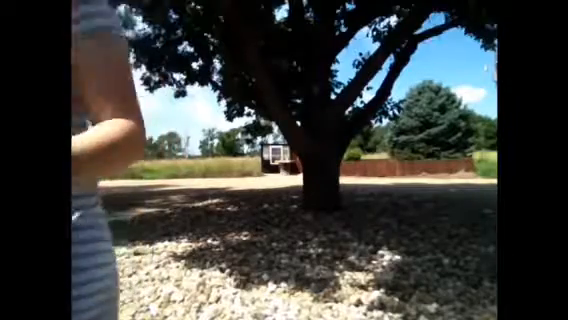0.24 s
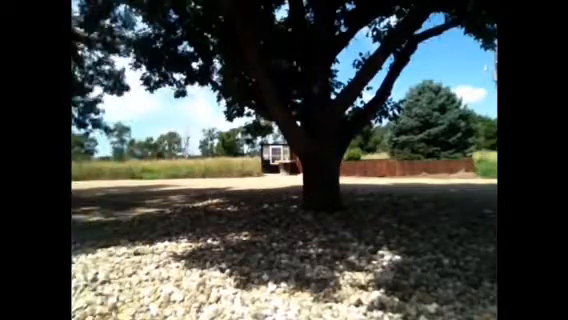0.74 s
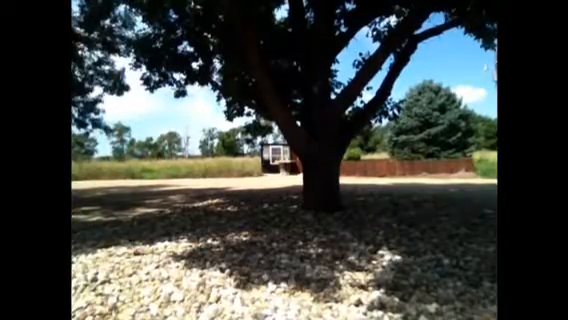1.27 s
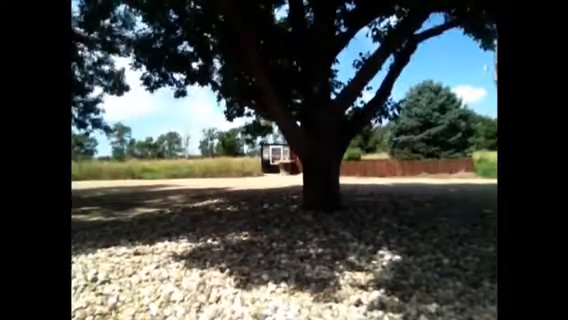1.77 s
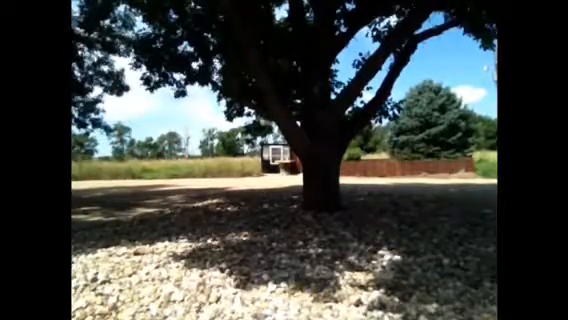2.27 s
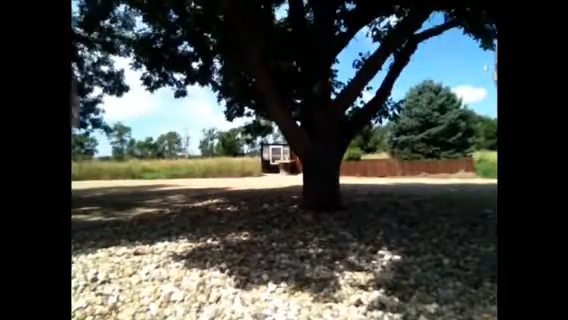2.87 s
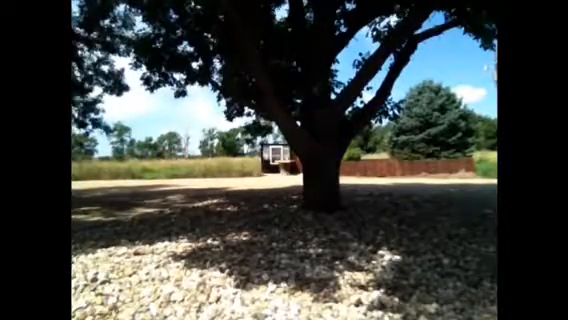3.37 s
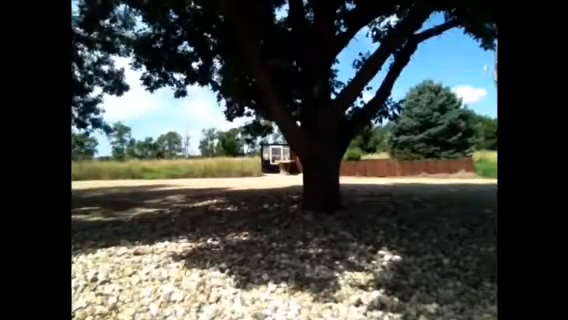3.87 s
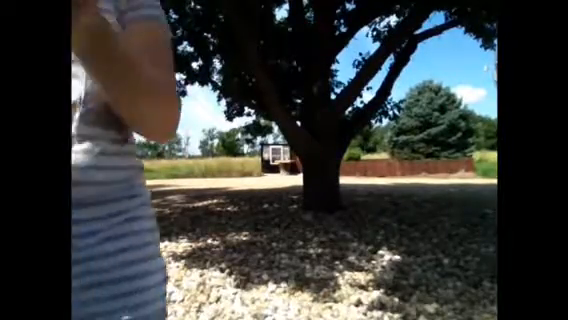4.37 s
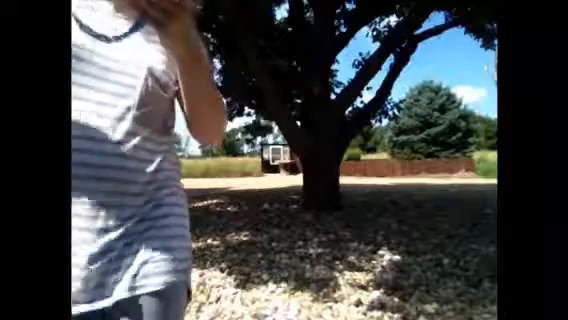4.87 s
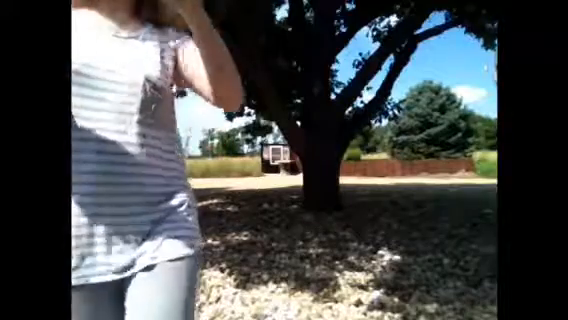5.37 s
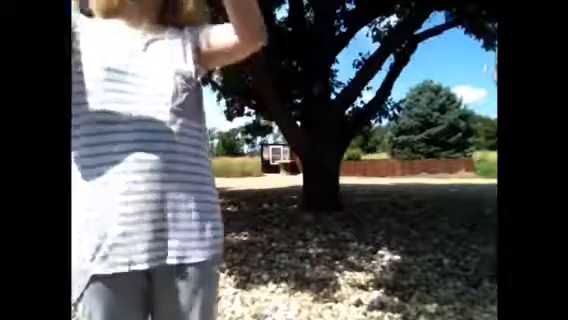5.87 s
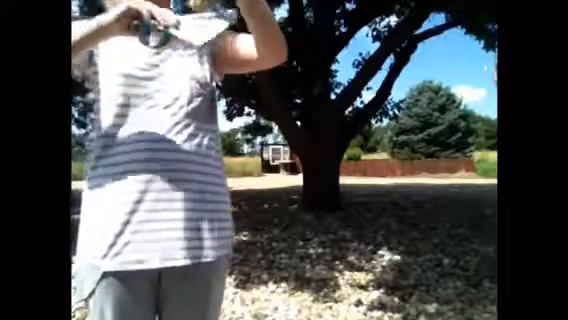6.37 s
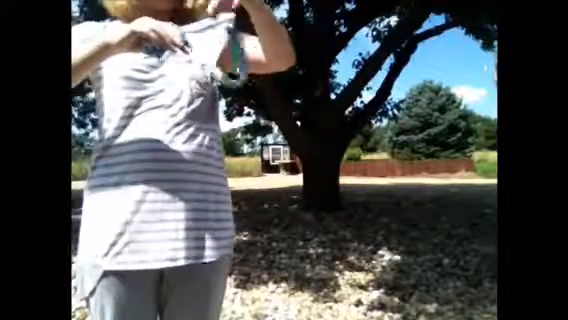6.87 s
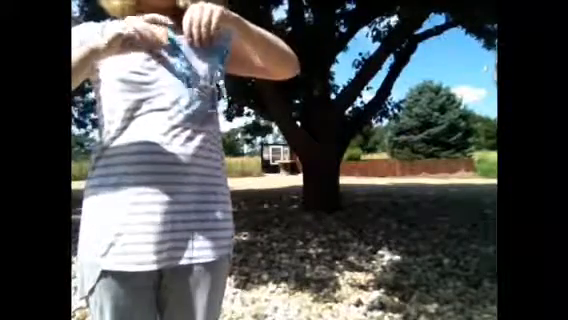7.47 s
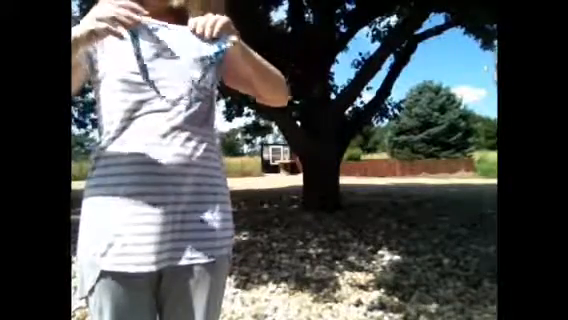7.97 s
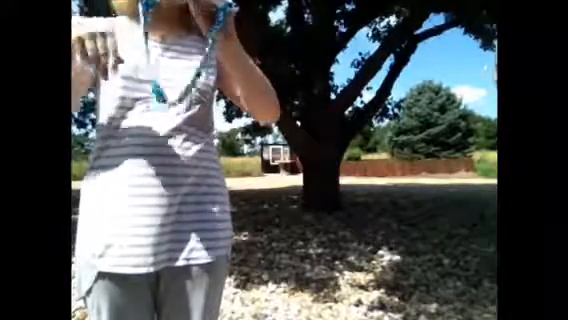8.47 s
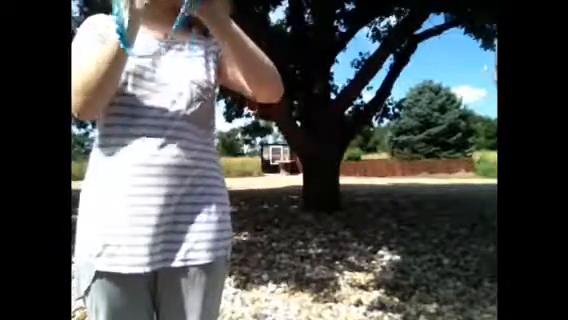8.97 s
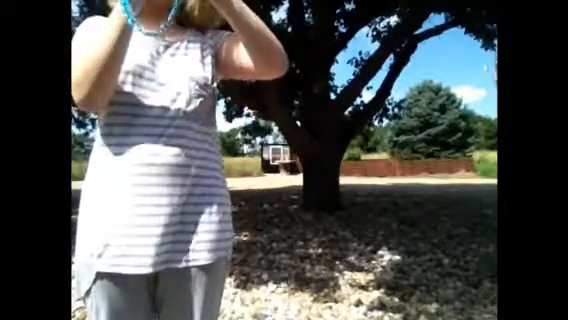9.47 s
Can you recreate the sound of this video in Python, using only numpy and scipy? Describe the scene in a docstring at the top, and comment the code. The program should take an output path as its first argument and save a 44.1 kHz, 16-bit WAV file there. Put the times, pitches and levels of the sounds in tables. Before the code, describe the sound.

Quiet outdoor yard with faint birds and leaf hiss; nearby wooden knocks in three clusters, light metallic ticks and a gritty slide, then soft footsteps.

```python
"""A quiet summer yard under a big tree, heard on a phone: from the start, coloured noise makes distant air,
a low drone and the bright hiss of leaves and insects, small birds whistle gliding tones far off in the
trees, and dry litter snaps in short noise bursts. Before the first second a wooden door close by is shoved
along its track (gritty noise) and knocked (ringing modes), with two faint thuds. From about 2.5 s a loose
fitting ticks as the door slides and latches; from about 3.9 s slow steps thud and snap more litter."""
import sys
import numpy as np
from scipy import signal
from scipy.fft import rfft, irfft
from scipy.io import wavfile
from scipy.ndimage import uniform_filter1d

SR = 44100
rng = np.random.default_rng(int(sys.argv[2]) if len(sys.argv) > 2 else 0)


def boost_factor(decibels):
    """Convert a level in decibels to a linear amplitude factor."""
    exponent = np.asarray(decibels, float) / 20
    return 10 ** exponent


def dump(signal):
    """Clip the signal to [-1, 1] and save it as 16-bit WAV at the path in sys.argv[1]."""
    limited = np.clip(np.atleast_2d(signal).T, -1, 1)
    pcm = np.round(limited * 32767).astype(np.int16)
    wavfile.write(sys.argv[1], SR, pcm)


N = 429093
T = np.arange(N) / SR  # time [s]

# tone colour of the distant air: (frequency [Hz], relative level per Hz [dB])
AIR_COLOUR = [(15, -35), (25, -13), (49, -59), (96, -8.5), (220, 4), (296, -7), (376, -2.5), (442, -2),
              (627, -8.5), (820, -8), (1400, -13.5), (6140, -13.5), (7210, -13.5), (10800, -8),
              (15300, -23)]
# distant machine: (frequency [Hz], width [Hz], level [dB])
DRONE_TONES = [(239.3, 17.97, -69), (354.3, 43, -66), (448, 40, -69)]
# the breeze over time: (time [s], leaf hiss level [dB], level of the rumble on the microphone [dB])
BREEZE_LEVELS = [(0, -59.5, -80), (.8, -60.5, -80), (.92, -60.5, -71), (1.45, -64, -73), (2.1, -60, -75),
                 (2.46, -62, -82), (2.75, -67, -84), (3.4, -61.5, -79), (3.9, -64.5, -74),
                 (4.5, -59.5, -76.5), (5.25, -60.5, -76.5), (5.75, -68, -70), (5.98, -64, -75),
                 (6.15, -57, -75.5), (6.7, -62, -75.5), (8.2, -59.5, -80), (8.6, -62.5, -82),
                 (9.25, -64.5, -82), (9.73, -60, -83)]
# colour of the leaf hiss: (frequency [Hz], width [Hz], relative level [dB])
LEAF_BANDS = [(10610, 2000, -3.5), (12180, 3100, 0), (14300, 2100, -3.5)]

# one bird opens each call with a quick hoarse upward chip: (time [s], first pitch [Hz], level [dB])
BIRD_CHIPS = [(0.241, 5550, -50.5), (1.39, 6000, -62), (2.335, 5600, -62), (4.15, 5440, -59),
              (5.49, 5950, -65), (7.335, 6170, -59.5), (8.548, 5900, -50.5)]
# falling slurs, all sliding down at one pace: (time [s], length [s], first pitch [Hz], level [dB])
BIRD_SLURS = [(0.309, .053, 6500, -54.5), (0.537, 0.08, 6600, -70), (1.444, 0.088, 6430, -58.5),
              (1.967, 0.075, 5900, -66), (2.388, 0.074, 6550, -58.5), (5.562, 0.067, 6540, -62),
              (5.847, .08, 6800, -73), (6.735, 0.079, 6770, -66), (7.404, 0.041, 6550, -53.5),
              (8.115, 0.065, 6600, -69), (8.176, .031, 4950, -63.5), (8.37, .05, 6130, -67),
              (8.408, .04, 4980, -64.5), (8.607, 0.03, 6580, -51), (8.635, 0.043, 5050, -66),
              (9.045, 0.054, 4300, -68.5), (9.39, .05, 7070, -69), (9.434, 0.037, 6070, -63.5),
              (9.48, .04, 5800, -74)]
# swoops and slow glides: (time [s], length [s], first pitch [Hz], last pitch [Hz], level [dB])
BIRD_GLIDES = [(0, 0.14, 4830, 4430, -76), (3.82, .096, 4930, 4300, -73), (3.94, 0.053, 4300, 4590, -71.5),
               (6.012, .21, 3200, 3400, -79), (6.798, .3, 5650, 5150, -77),
               (8.746, .077, 3320, 5280, -67.5), (8.925, 0.065, 3300, 6150, -65)]
# peeps on one pitch: (time [s], length [s], pitch [Hz], level [dB])
BIRD_PEEPS = [(.295, 0.018, 6720, -50.5), (1.28, .08, 7000, -75), (1.585, .16, 4580, -73),
              (1.8, .04, 7130, -73), (2.015, .055, 4110, -71), (2.11, .04, 3290, -73),
              (2.28, .045, 5520, -70), (4.2, 0.015, 6750, -57.5), (4.6, .24, 6980, -76.5),
              (6.135, .04, 7100, -72), (6.35, .024, 6600, -70), (7.1, .08, 6830, -74),
              (7.5, 0.022, 6050, -66), (7.685, .058, 6320, -72.5), (8.07, 0.06, 6750, -71),
              (8.265, 0.065, 5600, -71), (8.665, .026, 6050, -65)]

# dry litter snapping: (time [s], peak level [dB], centre [Hz], width [octaves], crunch against break [dB])
LITTER_SNAPS = [(.16, -49, 1800, .4, -16), (.193, -39, 2320, 0.52, -23), (1.1994, -52, 2430, 0.49, -7),
                (2.176, -39, 2900, 1.1, -16), (3.88, -48, 4020, 1.6, -8.5), (4.38, -46.5, 3210, 0.21, -25),
                (4.394, -53, 1600, 1.1, -13), (4.559, -48, 1590, .6, -13), (4.708, -46.5, 3140, .12, -29),
                (4.9792, -51, 1000, 0.48, -10), (5.022, -46, 5800, 0.6, -21),
                (5.064, -41.5, 2300, 0.84, -16), (5.314, -39, 6000, 1.3, -24),
                (5.346, -39.5, 2700, .7, -11), (5.347, -41, 5100, .55, -19),
                (5.657, -29.5, 5300, 0.81, -19.5), (5.6894, -52, 4500, .9, -8),
                (6.5318, -39, 4380, 0.8, -17), (7.1375, -48, 3800, .7, -19), (7.315, -46, 4000, .65, -20),
                (9.0242, -50, 1300, 0.9, -14)]

# shoves of the door: (time [s], length [s], level [dB], hiss centre at start [Hz], at end [Hz])
DOOR_SHOVES = [(0.816, 0.13, -67.5, 3600, 4200), (0.968, 0.16, -71, 3600, 4300),
               (2.2, .13, -67, 4600, 4560), (2.558, 0.16, -62.5, 4000, 4200),
               (2.72, .14, -60.5, 4100, 4500), (2.938, 0.16, -61, 5400, 6300),
               (3.11, 0.11, -58.5, 5000, 5130)]
# resonances of the door's track: (frequency [Hz], width [Hz], relative level [dB])
TRACK_BANDS = [(2300, 1400, 10), (3400, 950, 2), (4300, 700, 0), (4950, 220, -5), (5900, 1200, -0.5),
               (6800, 98, -3), (8100, 600, -6)]

# blows on the door: (time [s], peak level [dB], contact colour [Hz],
# hardness = crack peak against the body of the blow [dB], rattle strength [dB])
DOOR_KNOCKS = [(.819, -42, 2400, -2, -11), (0.833, -46, 400, 3.5, 2), (0.875, -45, 300, -12, -8),
               (0.912, -39.5, 320, -16, -3), (.945, -14.5, 1450, -16, -14.5), (.963, -30.5, 605, -8.5, -13),
               (1.045, -48, 700, -14, 2), (1.323, -21, 720, -18.5, -16), (1.428, -34.5, 1400, -9, -6),
               (1.437, -10.5, 680, -5, -17), (1.508, -31, 537, -17, -11), (1.537, -28, 400, -15.5, -14.5),
               (1.909, -20, 696, -11, -10.5), (1.915, -7, 950, -7, -10.5), (1.943, -17.5, 850, -12.5, -10),
               (1.99, -34.5, 580, -26, -4), (3.214, -12, 1650, -18, -16), (3.225, -28, 900, 2.5, -13),
               (3.254, -41.5, 1350, -2, -15), (3.424, -19, 970, -10, -12.5), (3.436, -27, 1480, -0.5, -13),
               (3.47, -41, 1200, -10, -2), (3.498, -28.5, 1700, -26, -8), (3.516, -34, 1370, -17, -12.5)]
# what the door rings with: (frequency [Hz], relative level [dB], time to fall 60 dB [s])
DOOR_MODES = [(171.5, -12.5, 0.073), (262, -14, 0.053), (326, -9.5, 0.073), (400, -3, 0.062),
              (430, -10, 0.055), (538, -5, 0.044), (602, -5.5, 0.046), (681, -5, 0.046), (783, -6, 0.028),
              (940, 1, 0.02), (1025, -9.5, 0.045), (1200, -2, 0.027), (1400, -0.5, 0.028),
              (1667, -2, 0.023), (1970, -4.5, 0.017), (2330, -5, 0.026), (3010, -11, 0.016),
              (3900, -8.5, 0.0077)]

# heels on soft ground: (time [s], peak level [dB], thud pitch [Hz])
HEEL_STEPS = [(.873, -47, 150), (.912, -47, 180), (3.883, -43.5, 156), (3.944, -53, 199), (4.039, -58, 105),
              (4.409, -49.5, 106), (5.461, -44, 155), (5.693, -49, 181), (5.953, -54, 99.6),
              (6.085, -49, 118), (6.119, -43.5, 139), (6.229, -52, 130.7)]

# ticks of the loose fitting: (time [s], peak level [dB], brightness [dB per octave])
FITTING_TICKS = [(2.4872, -49, -12), (2.6206, -30, 8), (2.6274, -39.5, 23), (2.635, -34, 12),
                 (2.66, -43.5, 2), (2.6745, -46, -8), (2.7726, -48, 13), (2.7995, -40.5, 9.5),
                 (2.8409, -40.5, -1), (2.8687, -35, 6), (2.889, -44, -1), (2.9287, -44, -18),
                 (3.024, -48.5, 4), (3.044, -48.5, -13), (3.092, -40.5, -16), (3.1064, -48, -10),
                 (3.1825, -51, -13), (3.215, -25, -7), (3.437, -28, 6), (3.545, -36, -20)]
# what the fitting rings with: (frequency [Hz], relative level [dB], time to fall 60 dB [s])
FITTING_MODES = [(1400, 17, 0.023), (1900, -13, .01), (2360, 10.5, 0.023), (3200, -21, .015),
                 (4600, -14, 0.0094), (7140, -24, 0.017)]


def unit(x):
    """Scale to rms 1."""
    return x / np.sqrt(np.mean(x ** 2))


def band(x, hz, width_hz):
    """One resonance, gain 1 at its centre."""
    return signal.lfilter(*signal.iirpeak(min(hz, .45 * SR), hz / width_hz, SR), x)


def ring(modes, size, tilt_db=0):
    """Sum of dying sine waves, made brighter or duller by a tilt in dB per octave about 2 kHz."""
    t = np.arange(size) / SR
    out = np.zeros(size)
    for hz, db, t60 in modes:
        fading = boost_factor(db + tilt_db * np.log2(hz / 2000) - 60 * t / t60)
        out += fading * np.sin(2 * np.pi * hz * t)
    return out


def add(out, s, peak_db, x):
    """Lay a sound down at time s with the given peak."""
    i = max(int(s * SR), 0)
    out[i:i + len(x)] += (x * boost_factor(peak_db) / np.abs(x).max())[:N - i]


def walk(rate):
    """Slow random wandering of rms 1, drawing new values at the given rate per second."""
    k = int(SR / rate)
    held = np.repeat(rng.standard_normal(N // k + 1), k)
    smooth = uniform_filter1d(uniform_filter1d(held, k), k)
    return unit(smooth[:N])


def distant_air():
    """Smooth steady noise, coloured by shaping its spectrum."""
    hz, db = np.transpose(AIR_COLOUR)
    f = np.maximum(np.fft.rfftfreq(N, 1 / SR), 1)
    colour = boost_factor(np.interp(np.log(f), np.log(hz), db))
    air = irfft(rfft(rng.standard_normal(N)) * colour, N)
    return boost_factor(-59) * unit(air)


def distant_drone():
    """Narrow bands of noise make low tones that waver in level."""
    out = np.zeros(N)
    for hz, width, db in DRONE_TONES:
        tone = unit(band(rng.standard_normal(N), hz, width))
        out += boost_factor(db + 1.7 * walk(3.155)) * tone
    return out


def breeze():
    """The breeze stirs leaves into a high hiss and makes a low rumble on the microphone."""
    s, leaf_db, rumble_db = np.transpose(BREEZE_LEVELS)
    leaves = np.zeros(N)
    for hz, width, db in LEAF_BANDS:
        hiss = unit(band(band(rng.standard_normal(N), hz, width), hz, width))
        leaves += boost_factor(db + walk(3.5) / 2) * hiss
    rumble = unit(band(band(rng.standard_normal(N), 106, 79.2), 106, 79.2))
    rumble = rumble * boost_factor(0.83 * walk(36))
    leaf_level = boost_factor(np.interp(T, s, leaf_db) + walk(10) / 2)
    return leaf_level * unit(leaves) + boost_factor(np.interp(T, s, rumble_db)) * rumble


def birds():
    """Gliding whistles with a shaky pitch, smeared by echoes off trunks and fences."""
    chip_s, chip_rise_hz, slur_hz_per_s = 0.021, 1700, -17500
    chip_hoarse_hz, hoarse_hz = 260, 73.5  # rms size of the pitch shake
    notes = []
    for s, hz, db in BIRD_CHIPS:
        notes.append((s, chip_s, hz, hz + chip_rise_hz, db, chip_hoarse_hz))
    for s, length, hz, db in BIRD_SLURS:
        notes.append((s, length, hz, hz + slur_hz_per_s * length, db, hoarse_hz))
    for s, length, first_hz, last_hz, db in BIRD_GLIDES:
        notes.append((s, length, first_hz, last_hz, db, hoarse_hz))
    for s, length, hz, db in BIRD_PEEPS:
        notes.append((s, length, hz, hz, db, hoarse_hz))

    out, shake = np.zeros(N), walk(900)
    for s, length, first_hz, last_hz, db, shake_hz in notes:
        i, n = int(max(s, 0) * SR), int(length * SR)
        pitch = np.linspace(first_hz, last_hz, n) + shake_hz * shake[i:i + n]
        whistle = np.sqrt(2) * np.sin(2 * np.pi * np.cumsum(pitch) / SR)
        # the fades at both ends together take 0.35 of the note
        out[i:i + n] += boost_factor(db) * signal.windows.tukey(n, .35) * whistle

    t = T[:SR // 2]
    echoes = rng.standard_normal(len(t)) * boost_factor(-60 * t / .35)  # fall by 60 dB in 0.35 s
    echoes = echoes / np.linalg.norm(echoes)
    return out + boost_factor(2) * signal.fftconvolve(out, echoes)[:N]


def snaps():
    """A sharp break inside a short soft crunch, both made of filtered noise."""
    break_s, crunch_s, lead_s = 0.0011, 0.02, .03  # the crunch starts ahead of the break by lead_s
    out, t = np.zeros(N), T[:SR // 8] - lead_s
    for s, peak_db, hz, octaves, crunch_db in LITTER_SNAPS:
        sharp = (t >= 0) * np.exp(-np.abs(t) / break_s)
        crunch = boost_factor(crunch_db) * np.exp(-(t / crunch_s) ** 2)
        burst = (sharp + crunch) * rng.standard_normal(len(t))
        burst = band(band(burst, hz, hz * octaves), hz, 2 * hz * octaves)
        add(out, s - lead_s, peak_db, burst)
    return out


def slide():
    """Gritty, uneven friction; speed sets which resonances of the track it reaches."""
    rise_s, stop_s, reach_octaves = .07, .03, 0.5
    grit = rng.standard_normal(N) * boost_factor(0.76 * walk(60))
    tones = []
    for hz, width, mode_db in TRACK_BANDS:
        tone = unit(band(band(grit, hz, width), hz, 0.69 * width))
        tones.append(boost_factor(mode_db + 1.1 * walk(24.77)) * tone)

    out = np.zeros(N)
    for s, length, db, first_hz, last_hz in DOOR_SHOVES:
        # the table's start and end fall halfway up and down the fades
        fade = np.minimum((T - s) / rise_s, (s + length - T) / stop_s) + .5
        gate = boost_factor(db) * np.clip(fade, 0, 1)
        centre_hz = np.interp(T, [s, s + length], [first_hz, last_hz])
        for (hz, _, _), tone in zip(TRACK_BANDS, tones):
            reach = np.exp(-(np.log2(hz / centre_hz) / reach_octaves) ** 2)
            out += gate * tone * reach
    return out


def knocks():
    """Each blow is a push and a dying rattle; both ring the door and are also heard bare, as a crack."""
    crack_s, crack_hz, crack_width_hz = 0.00062, 2800, 1150
    out, t = np.zeros(N), T[:SR // 3]
    push = t == 0
    for s, peak_db, hz, crack_db, rattle_db in DOOR_KNOCKS:
        # a harder contact reaches a wider band of modes
        width_hz = hz * 2.96 * 2 ** (.08 * crack_db)
        noise = rng.standard_normal((3, len(t)))

        # every spot struck drives the modes with other signs;
        # their pitches shift a little at random so that repeated blows do not ring identically
        door = np.zeros(SR // 8)
        for mode_hz, db, t60 in DOOR_MODES:
            sign, shift = np.sign(rng.standard_normal()), rng.standard_normal() / 30
            door += sign * ring([(mode_hz * (1 + shift), db, t60)], size=SR // 8)

        rattle = boost_factor(rattle_db - 60 * t / 0.11)
        # the rattle dulls as it settles: its low part lasts longest
        settling = boost_factor(rattle_db - 60 * t / 0.23) * band(noise[2], 270, 680)
        settling = settling * (700 / hz) ** 0.697
        drive = push + 0.09 * rattle * noise[0] + 0.15 * settling
        body = signal.fftconvolve(drive, door)[:len(t)]
        body = band(band(body, hz, width_hz), hz, 3.5 * width_hz)
        add(out, s, peak_db, body)

        # the bright part of the rattle dies sooner; a half-millisecond fade softens the onset
        bare = np.exp(-t / crack_s) + rattle * boost_factor(-60 * t / .2)
        bare = bare * np.minimum(t / .0005, 1) * noise[1]
        crack = band(band(bare, crack_hz, crack_width_hz), crack_hz, 16000)
        add(out, s, peak_db + crack_db, crack)
    return out


def steps():
    """A heel on soft ground gives a dull thud of about one cycle."""
    out = np.zeros(N)
    for s, peak_db, hz in HEEL_STEPS:
        turns = T[:SR // 20] * hz  # cycles since the heel landed
        swell = turns * np.exp(-(turns / 1.05) ** 2 * 2)
        add(out, s, peak_db, np.sin(2 * np.pi * turns) * swell)
    return out


def ticks():
    """Light metal contacts: a gritty edge and a few short modes, shifted a little at random each time."""
    out = np.zeros(N)
    for s, peak_db, tilt_db in FITTING_TICKS:
        contact = np.diff(rng.standard_normal(SR // 500) * np.hanning(SR // 500))
        modes = [(hz * (1 + rng.standard_normal() / 40), db, t60) for hz, db, t60 in FITTING_MODES]
        ringing = ring(modes, size=SR // 20, tilt_db=tilt_db)
        add(out, s, peak_db, np.convolve(contact, ringing))
        grit = rng.standard_normal(SR // 20) * boost_factor(-60 * T[:SR // 20] / 0.054)
        # duller ticks have a weaker gritty edge
        add(out, s, peak_db - 6 + 0.33 * min(tilt_db, 0), band(grit, 2400, 3100))
    return out


def scene():
    """Birds and air far off, door and steps close by, in one channel."""
    far = distant_air() + distant_drone() + breeze() + birds()
    near = snaps() + slide() + knocks() + steps() + ticks()
    return (far + near)[None]


def top_cut(x):
    """Nothing passes above the cut-off."""
    return signal.sosfilt(signal.butter(12, 15390, fs=SR, output="sos"), x)


def record(dry):
    """The phone's microphone drops the deep bass, below about 70 Hz."""
    bass_cut = signal.butter(2, 70, "high", fs=SR, output="sos")
    mix = signal.sosfilt(bass_cut, dry)
    return top_cut(mix)


dry = scene()
out = record(dry)
dump(out)
```